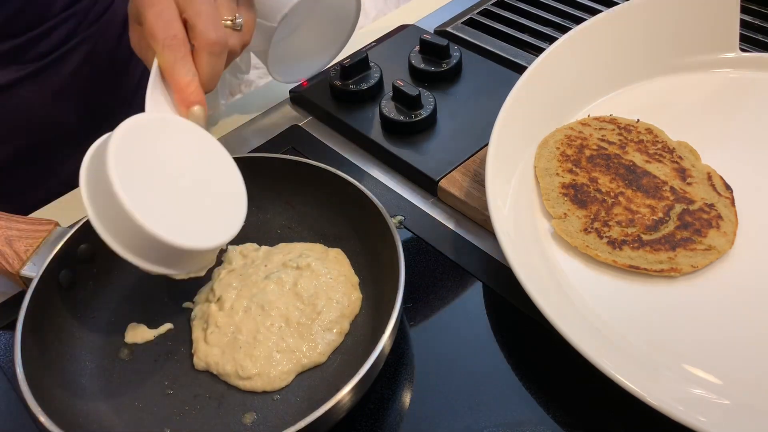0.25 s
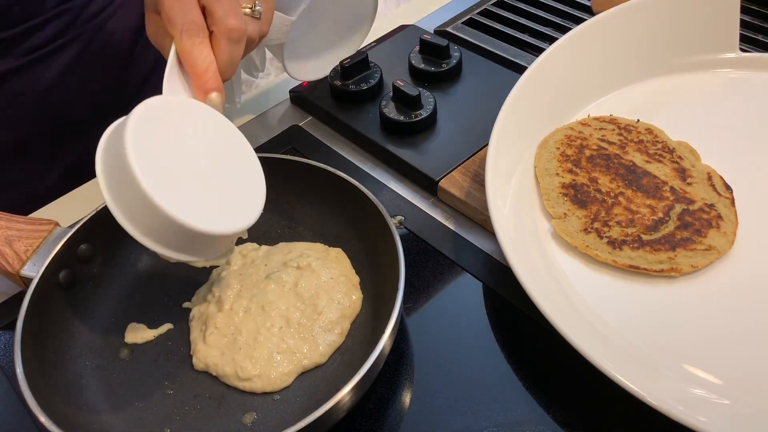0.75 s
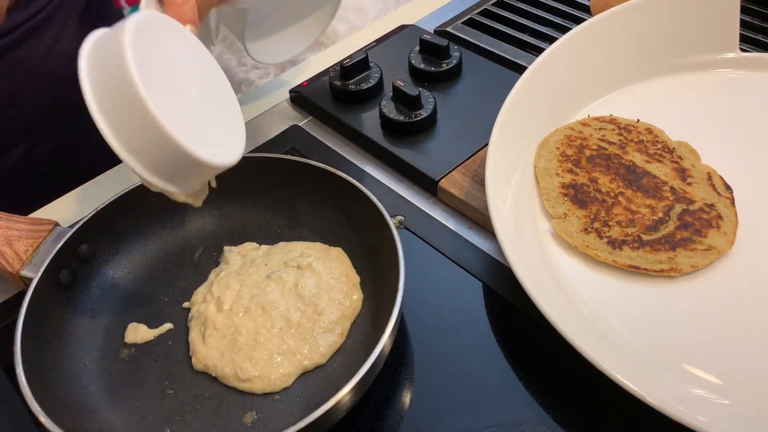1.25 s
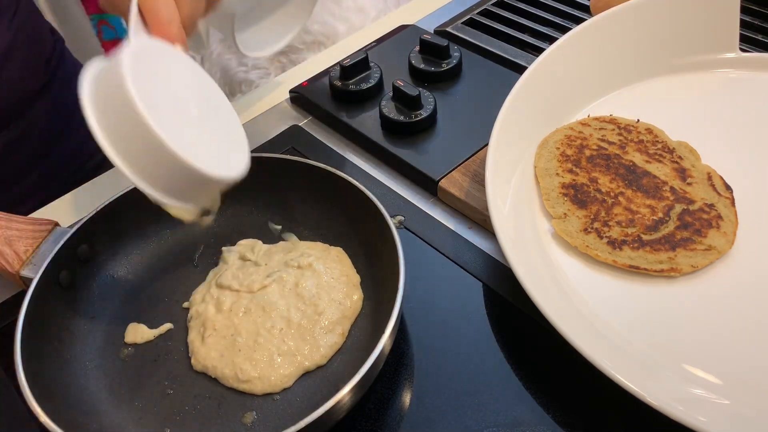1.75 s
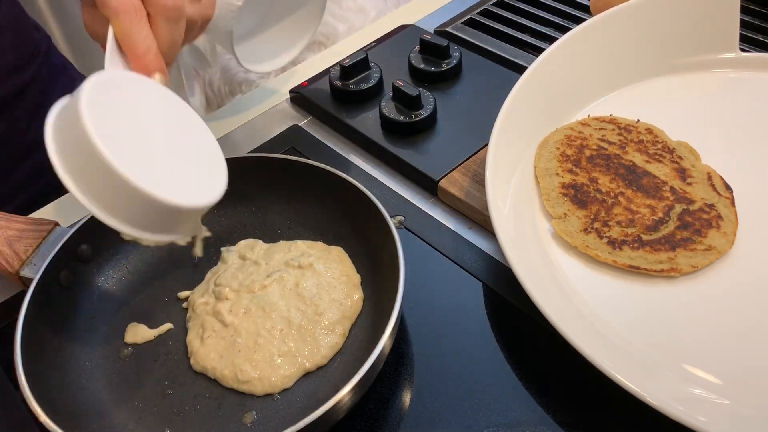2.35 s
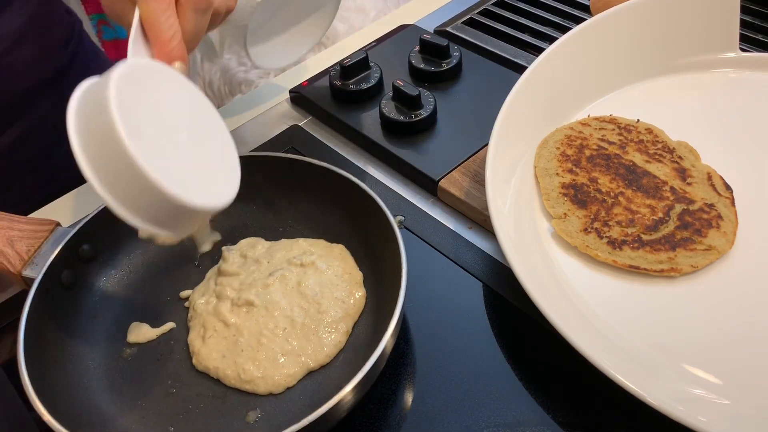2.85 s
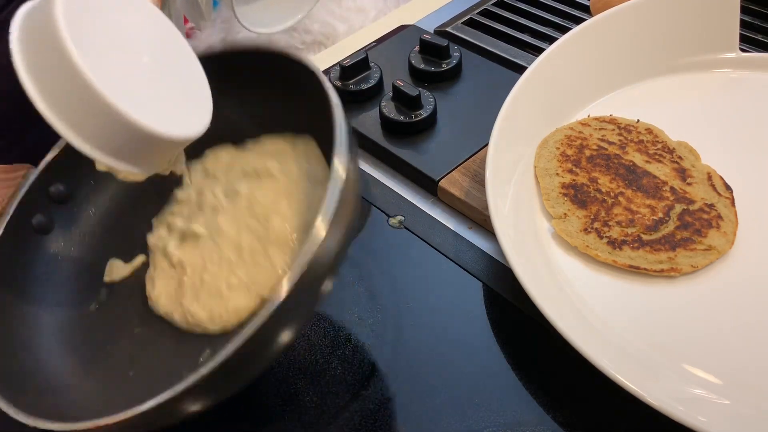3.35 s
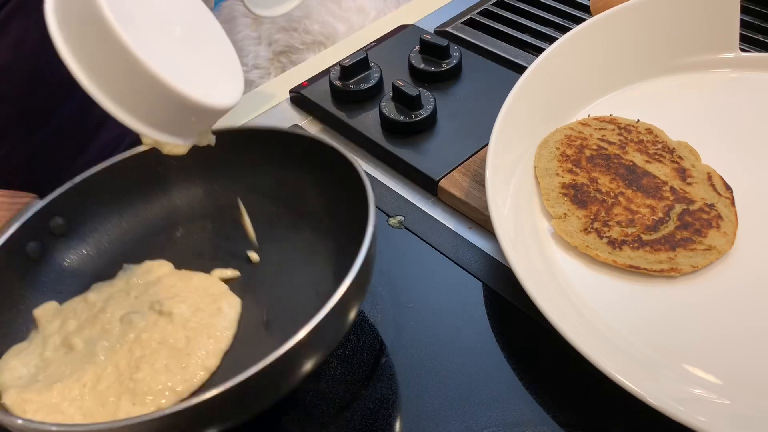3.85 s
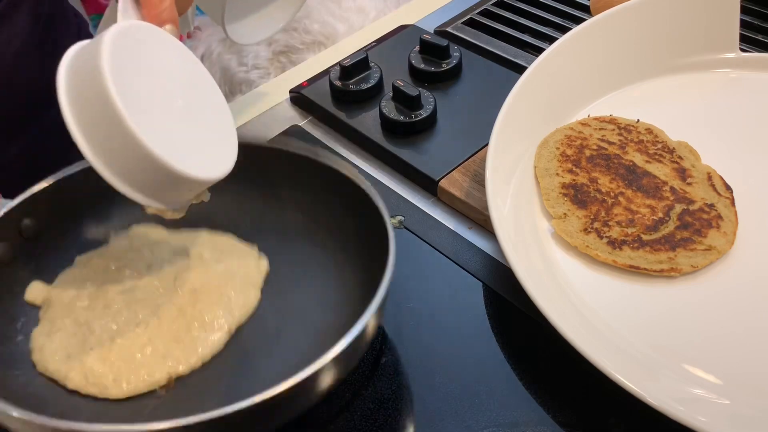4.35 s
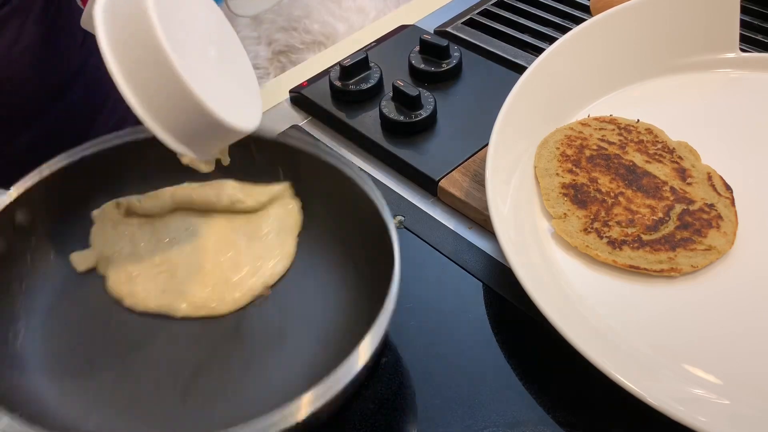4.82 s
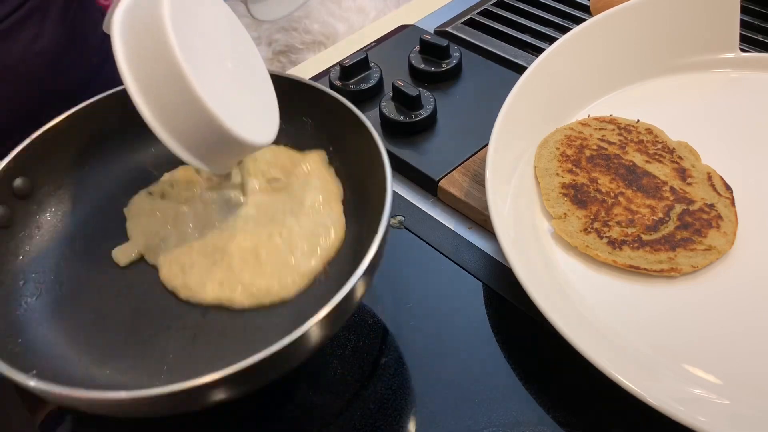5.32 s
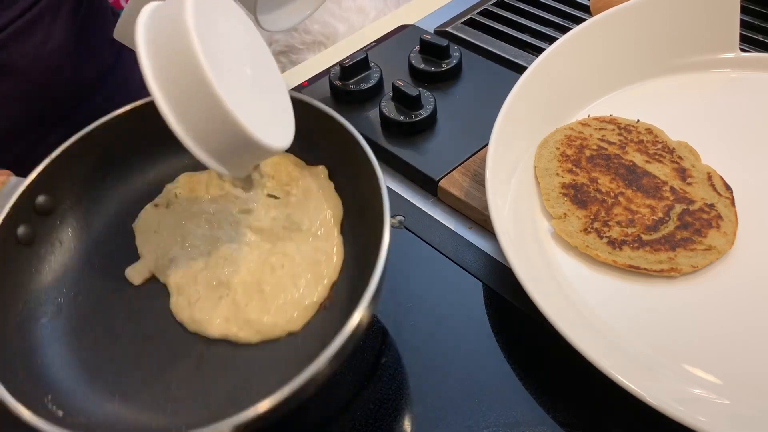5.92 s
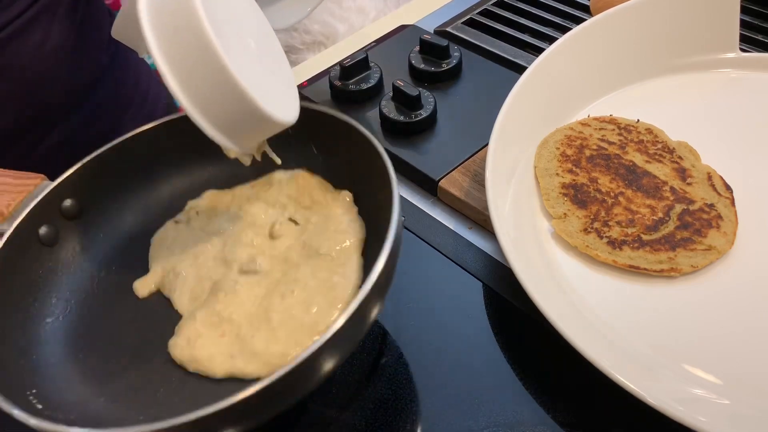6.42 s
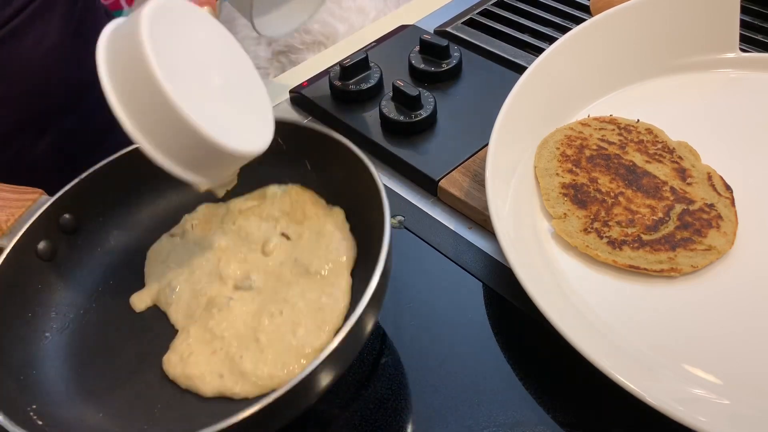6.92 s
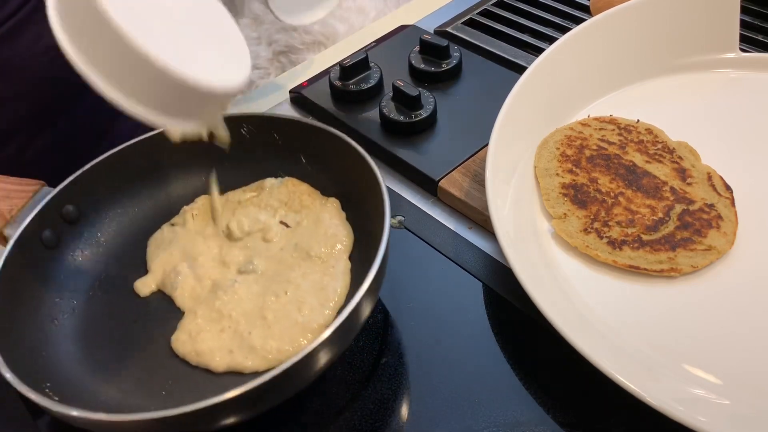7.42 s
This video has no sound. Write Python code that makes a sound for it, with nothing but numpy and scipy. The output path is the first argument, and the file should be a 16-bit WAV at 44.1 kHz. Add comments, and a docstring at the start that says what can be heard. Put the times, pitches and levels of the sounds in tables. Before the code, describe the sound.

Wet batter sizzles in a hot buttered pan as a steady bright fizz, then surges in quick pulses as the pan is swirled.

```python
"""Batter in a buttered pan

Batter sizzles close to a phone in a kitchen; from about 3 s the pan is lifted and swirled.
Steam bubbles burst as a dense fizz: noise of uneven grain that surges with each shake.
A cup ticks, dishes clink, a spoon chinks and the pan bumps: struck modes with crack, rattle and room.
Behind lie filtered-noise air, a low simmer, and motors and a whine made of wavering sines."""
import sys
import numpy as np
from scipy import signal
from scipy.fft import rfft, irfft, next_fast_len
from scipy.io import wavfile
from scipy.ndimage import uniform_filter1d, map_coordinates

SR = 44100
rng = np.random.default_rng(int(sys.argv[2]) if len(sys.argv) > 2 else 0)


def store_wav(level_fs):
    """Save 16-bit WAV to argv[1]."""
    pcm = np.round(np.clip(np.atleast_2d(level_fs), -1, 1) * 32767)
    wavfile.write(sys.argv[1], SR, pcm.T.astype(np.int16))


def invert_db(level):
    """Linear amplitude ratio for a level in decibels (20 dB per decade), elementwise."""
    return 10 ** (np.asarray(level, dtype=float) / 20)


N = 338322
T = np.arange(N) / SR
F = np.fft.rfftfreq(next_fast_len(N), 1 / SR) + 1e-3  # tiny offset keeps logs and divisions finite


def over_time(table):
    """Each column of a table as a straight-line curve."""
    s, *columns = np.transpose(table)
    return [np.interp(T, s, c) for c in columns]


def over_hz(table, hz):
    """Value of a table of f/Hz and value, read on a log axis."""
    return np.interp(np.log(hz), np.log(np.array(table)[:, 0]), np.array(table)[:, 1])


def shape(x, gain):
    """Filter by a gain given on the frequency grid."""
    return irfft(rfft(x, next_fast_len(N)) * gain, next_fast_len(N))[..., :N]


def unit(x):
    """Scale to rms 1."""
    return x / np.sqrt(np.mean(x ** 2))


def walk(rate):
    """Random levels held 1 / rate s and slewed twice; spread near 1."""
    k = int(SR / rate)
    held = np.repeat(rng.standard_normal(N // k + 1), k)
    return 1.3 * uniform_filter1d(uniform_filter1d(held, k), k)[:N]


def late(x, lag):
    """Delay by a fractional, possibly moving, number of samples."""
    return map_coordinates(x, [np.arange(N) - lag], order=3, mode="nearest")


# Colour of the fizz, relative: [f/Hz, level/dB per Hz]
FIZZ_COLOUR = [(700, -37), (880, -25), (960, -16.5), (1500, -14), (2300, -11), (3200, -10), (4500, -8),
               (7600, -4), (8300, 0.5), (11500, 0.5), (16000, 1.5)]
# Weight of the scattered share across the range: [f/Hz, weight]
SCATTER_WEIGHT = [(700, 0.26), (1600, 1.74), (2200, 0.78), (2700, 0.26), (3200, 0.81), (3800, 1.14),
                  (6500, 2.05), (8000, 0.46), (9300, 0.19), (10500, .2), (11300, 0.03), (12300, 0.13),
                  (16000, 0.17)]
# Where the pan is: [t/s, right port lag/samples]
PAN_PLACE = [(0, 7.7), (2.9, 7.34), (3.1, 9.5), (4.5, 9.8), (4.9, 8.7), (6.1, 8.3), (6.7, 9.7), (7.67, 8.4)]
# Steam from the hot batter between shakes: [t/s, level/dB]
STEAM_HEAT = [(0, -33.5), (1.99, -32.5), (2.94, -34), (3.14, -43), (3.66, -36), (4.16, -39.5), (4.7, -35),
              (5.06, -34.5), (5.4, -35.5), (5.9, -39.5), (6.25, -35), (6.52, -41.5), (7.01, -39),
              (7.67, -42)]
# Each shake slides batter onto hot metal: [t/s, surge level/dB]
PAN_SHAKES = [(3.011, 5.5), (3.196, 7), (3.337, 9), (3.557, 4.5), (3.693, 2.5), (3.981, 3), (4.19, 3),
              (4.353, 3.5), (4.509, 0), (4.81, 3.5), (4.937, 1.5), (5.067, 2.5), (5.183, 3), (5.303, 1),
              (5.524, 2.5), (5.7, 4), (5.887, 6.5), (6.076, 4), (6.291, 3.5), (6.487, 5.5), (6.667, 6),
              (6.827, 4), (7.01, 3.5), (7.334, 1)]
# How each range follows the steam:
# [f/Hz, share of slow changes, share of surges, gain on lifting/dB, fade after it/(dB/s)]
STEAM_FOLLOW = [(1600, 0.75, 0.55, 7.5, 0.73), (4830, 0.73, 0.64, 2, 1), (9000, 0.9, 0.88, 0.65, 0.35)]


def sizzle():
    """Steam bursts as noise of uneven grain; steam sets its level, and each half octave flickers a little alone."""
    surge_s, settle_s = 0.035, 1  # spread of a surge; time over which slow changes are averaged
    lift_s, lift_takes_s = 2.82, 0.22
    scattered_on_hob, scattered_lifted = 0.6, 0.34  # multiply the scatter weight
    steam_db = over_time(STEAM_HEAT)[0]
    steam_db = steam_db + sum(db * np.exp(-.5 * ((T - s) / surge_s) ** 2) for s, db in PAN_SHAKES)
    slow_db = uniform_filter1d(steam_db, int(settle_s * SR), mode="nearest")
    lifted = np.clip((T - lift_s) / lift_takes_s, 0, 1)
    swings = [slow * slow_db + quick * (steam_db - slow_db) + lifted * (lift_db - fade_db * (T - lift_s))
              for _, slow, quick, lift_db, fade_db in STEAM_FOLLOW]
    scattered = scattered_on_hob + (scattered_lifted - scattered_on_hob) * lifted

    grain = np.minimum(rng.exponential(size=(3, N)), 5)  # caps the loudest bursts
    bursts = unit(rng.standard_normal((3, N)) * invert_db(2.25 * grain + 0.68 * walk(150)))
    # row 0 is the straight path, rows 1 and 2 are scattered paths, thin near 11380 Hz
    bursts[1:] = shape(bursts[1:], 1 - np.exp(-((F - 11380) / 800) ** 2))
    colour = invert_db(over_hz(FIZZ_COLOUR, F))
    colour = colour / np.sqrt(np.mean(colour ** 2 * (F > 11900) * (F < 15300)))

    out = 0
    for hz in 400 * 2 ** np.arange(0, 6, .5):
        window = np.cos(np.pi * np.clip(np.log2(F / hz), -.5, .5)) ** 2
        band = shape(bursts, colour * window)
        # each band blends the swings of the two nearest ranges
        range_hz = np.log([r[0] for r in STEAM_FOLLOW])
        weights = [np.interp(np.log(hz), range_hz, row) for row in np.eye(3)]
        swing_db = sum(w * (c - c.mean()) for w, c in zip(weights, swings))
        band = band * invert_db(steam_db.mean() + swing_db + 1.05 * walk(20))
        share = np.clip(scattered * over_hz(SCATTER_WEIGHT, hz), 0, 1)
        out = out + np.sqrt(1 - share) * band[0] + np.sqrt(share) * band[1:]

    # the pan is nearer the left port, but the phone's treble comes first on the right
    treble = 1 / (1 + (7800 / F) ** 100)
    treble_left_lag, in_step_hz = 10.0, 9180  # samples; pitch at which the delay turns no phase
    turn = np.exp(-2j * np.pi * treble * (F - in_step_hz) / SR * treble_left_lag)
    left = shape(out[0], turn)
    right = late(shape(out[1], np.sqrt(1 - treble)), over_time(PAN_PLACE)[0])
    right = right + shape(out[1], np.sqrt(treble))
    return np.array([left, right])


def strike(events, modes, blur_hz, crack_db, rattle_db, rattle_s, tail_db, tail_s, right_lag):
    """Blows crack and ring the modes in a new mix each time, over a rattle of like colour and a room tail."""
    out, t = np.zeros(N), T[:SR // 3]
    hz, db, t60 = np.transpose(modes)[:, :, None]
    swell = 1 - np.exp(-t * hz / 1.5)  # each mode takes a cycle or two to build, so the lows come late
    fine_hz = np.fft.rfftfreq(len(t), 1 / SR) + 1
    edges = [(hz.min() / 2, -40)] + [m[:2] for m in modes] + [(hz.max() * 2, -30)]
    for (s, peak_db, *spot_hz), luck in zip(events, rng.standard_normal((len(events), len(modes), 1))):
        rattle = irfft(rfft(rng.standard_normal(len(t))) * invert_db(over_hz(edges, fine_hz)), len(t))
        slip = rng.standard_normal((len(modes), len(t)))
        # loose contact makes each mode's phase drift, which blurs its pitch
        wander = np.sqrt(2 * np.pi * blur_hz / SR) * np.cumsum(slip, axis=1)
        # and it breaks each ring into uneven swells
        chatter = invert_db(2.4 * unit(uniform_filter1d(slip, size=500)))
        # the spot that is hit favours modes near one pitch: 56 dB down an octave away
        spot_db = -56 * np.log2(hz / spot_hz[0]) ** 2 if spot_hz else 0
        level = invert_db(db + spot_db + 2.4 * luck) * swell * chatter * 1000. ** (-t / t60)
        ring = (level * np.sin(2 * np.pi * hz * t + wander)).sum(0)
        ring = ring / abs(ring).max() + invert_db(rattle_db) * unit(rattle) * 1000. ** (-t / rattle_s)
        ring = ring + invert_db(crack_db) * slip[0] * 1000. ** (-t / .014)  # a flat crack in front
        i = int(s * SR)
        out[i:i + len(t)] += (invert_db(peak_db) * ring)[:N - i]
    room = rng.standard_normal((2, len(t))) * 1000. ** (-t / tail_s) * (t > .004)
    apart = irfft(rfft(room[1]) * np.clip(fine_hz / 900, 0, 1), len(t))  # bass reaches both ports alike
    room = np.array([room[0] + apart, room[0] - apart])
    room = irfft(rfft(room) / np.hypot(1, fine_hz / 3000), len(t))  # walls swallow the treble
    room = room / np.sqrt((room ** 2).sum(1, keepdims=True))
    wet = invert_db(tail_db) * signal.fftconvolve(out[None], room, axes=1)[:, :N]
    return np.array([out, late(out, right_lag)]) + wet


# Dish clinks, peak of the ring alone: [t/s, level/dB]
DISH_CLINKS = [(.829, -19), (.836, -27), (.847, -29), (.870, -30), (.912, -38), (.934, -38)]
# Dish modes, relative: [f/Hz, level/dB, t60/s]
DISH_MODES = [(68, -6, 0.3), (160, -8, .25), (240, -4, 0.25), (330, -2, 0.09), (470, 7, 0.09),
              (550, 3, 0.06), (694, 2, 0.11), (882, -6, 0.6), (1130, -25, .05), (1500, 5, 0.1),
              (1870, -1, 0.17), (2343, -5, 0.3), (2510, 1, .12), (2760, 2, 0.08), (3430, 3, .07),
              (3914, 6, 0.07), (4380, 0, 0.06), (5040, 3, 0.07), (5950, 4, 0.04), (6950, 1, .035),
              (7850, 3, 0.03)]


def dish_clinks():
    """Dishes clink further off in the room: a hard crack and many short modes."""
    return strike(DISH_CLINKS, DISH_MODES, blur_hz=12, crack_db=-1, rattle_db=-13, rattle_s=.12,
                  tail_db=-6.5, tail_s=.35, right_lag=1.2)


# Spoon chinks, peak of the ring alone: [t/s, level/dB]
SPOON_CHINKS = [(.4225, -22), (.438, -30.5)]
# Spoon modes, relative: [f/Hz, level/dB, t60/s]
SPOON_MODES = [(184.4, -18, 0.34), (400, -8, 0.055), (520, -8, 0.055), (644, -14, 0.097),
               (713, -11.5, 0.22), (1380, -28, 0.065), (2680, -14, 0.069), (3210, -9, 0.091),
               (3450, -7, 0.098), (4420, -5.5, 0.11), (4900, -14, .05), (5300, -3, 0.18), (6140, -7, 0.093),
               (7760, 2, 0.15), (8300, 4, .1), (9670, -11, .08)]


def spoon_chinks():
    """A spoon chinks in the room: bright modes over a strong rattle."""
    return strike(SPOON_CHINKS, SPOON_MODES, blur_hz=25, crack_db=-6, rattle_db=-8, rattle_s=.1,
                  tail_db=-4, tail_s=.3, right_lag=.6)


# Cup ticks, peak of the ring alone: [t/s, level/dB]
CUP_TICKS = [(.281, -27), (.503, -31), (.567, -34), (.635, -36)]
# Cup modes, relative: [f/Hz, level/dB, t60/s]
CUP_MODES = [(470, -8, 0.05), (870, -8, 0.04), (1250, -7, .03), (1620, -5, 0.03), (1900, -7, .03),
             (2230, -1, 0.07), (2740, 2, 0.09)]


def cup_ticks():
    """A cup ticks by the pan: short modes of well blurred pitch."""
    return strike(CUP_TICKS, CUP_MODES, blur_hz=30, crack_db=-14, rattle_db=-8, rattle_s=.05,
                  tail_db=-9, tail_s=.15, right_lag=8.2)


# Pan bumps, peak of the ring alone: [t/s, level/dB, favoured f/Hz]
PAN_BUMPS = [(.003, -39.5, 510), (.645, -49, 500), (2.111, -46.5, 500), (2.82, -42.5, 670),
             (2.825, -50, 100), (2.848, -42.5, 250), (2.851, -44, 620), (2.872, -46, 125), (2.895, -41, 95),
             (2.93, -46, 120), (2.957, -42, 255), (2.966, -40, 606), (3.735, -49.5, 410), (7.033, -48, 480),
             (7.048, -50, 760), (7.312, -49, 490)]
# Pan modes, relative: [f/Hz, level/dB, t60/s]
PAN_MODES = [(80, -8, 0.18), (124, -9, 0.16), (252, -5, 0.23), (387, -5, 0.094), (504, 2.5, 0.064),
             (620, -2, 0.064), (735, -9, 0.078)]


def pan_bumps():
    """The pan bumps on the hob: low modes, picked out by the spot that is hit."""
    return strike(PAN_BUMPS, PAN_MODES, blur_hz=6, crack_db=-30, rattle_db=-14, rattle_s=.12,
                  tail_db=-7, tail_s=.25, right_lag=1.5)


# Level of the low simmer: [t/s, level/dB rms]
SIMMER_LEVEL = [(0, -59.5), (.45, -55.5), (.7, -60.5), (1.0, -59), (1.3, -61), (2.84, -60.5), (3.1, -65),
                (3.8, -59), (4.2, -70), (4.7, -59), (5.5, -64), (6.2, -58.5), (7.2, -68), (7.67, -139)]


def low_simmer():
    """A low simmer comes and goes: fluttering noise in a broad hump around 620 Hz."""
    flutter = invert_db(2.2 * walk(25))
    hump = np.exp(-np.log2(F / 620) ** 2)
    simmer = shape(rng.standard_normal((3, N)) * flutter, hump)
    return invert_db(over_time(SIMMER_LEVEL)[0]) * unit(simmer[0] + 0.46 * simmer[1:])


# Colour of the room air, relative: [f/Hz, level/dB per Hz]
AIR_COLOUR = [(12, -39), (25, -8), (60, 1.5), (150, -3.5), (300, -4), (430, -7.5), (600, -15), (820, -15.5),
              (1000, -16.5), (1500, -42), (2600, -62)]
# Level of the room air: [t/s, level/dB rms]
AIR_CURVE = [(0, -57), (1.0, -57), (1.3, -59.5), (5.0, -59.5), (7.67, -62)]


def room_air():
    """Room air is dark noise, close to mono in the bass and wider above."""
    mid, side = shape(rng.standard_normal((2, N)), invert_db(over_hz(AIR_COLOUR, F)))
    side = shape(side, np.clip(F / 1000, .13, 1))
    return invert_db(over_time(AIR_CURVE)[0]) * unit(mid + side * np.array([[1], [-1]]))


HUM_IN_STEP_S = .27  # moment at which the steady lines would agree


def line(level_db, cycles):
    """A sine of given rms level, its phase in cycles."""
    return np.sqrt(2) * invert_db(level_db) * np.cos(2 * np.pi * cycles)


# Motor lines, the rotor just under the mains so they beat: [f/Hz, level/dB rms, waver/dB]
HUM_LINES = [(57.58, -63.5, 1.5), (60.06, -67.5, 1.5)]


def motor_hum():
    """Rotor and mains lines beat, each wavering in level and slipping a little in time."""
    slip_s = .0005
    return sum(line(db + waver_db * walk(12), hz * (T - HUM_IN_STEP_S + slip_s * walk(11)))
               for hz, db, waver_db in HUM_LINES)


# Level of the whine before its waver: [t/s, level/dB rms]
WHINE_LEVEL = [(0, -69), (6.2, -69.5), (6.7, -75), (7.67, -78)]


def whine():
    """A whine at the sixth multiple of the mains, unsteady in pitch and level."""
    drift = np.cumsum(1.47 * walk(8)) / SR  # cycles gained by a pitch that wavers a hertz or two
    return line(over_time(WHINE_LEVEL)[0] + 2.6 * walk(12), 360.3 * T + drift)


# Lines of the second motor, locked to the mains: [f/Hz, level/dB rms]
MOTOR_LINES = [(60.06, -62.5), (120.12, -60.5)]


def second_motor():
    """A second motor starts late: mains-locked lines that waver in level."""
    start_s, rise_s = 7.04, 0.026
    motor = sum(line(db + 1.4 * walk(18), hz * (T - HUM_IN_STEP_S)) for hz, db in MOTOR_LINES)
    return motor * np.clip((T - start_s) / rise_s, 0, 1)


def scene():
    """All sources together."""
    knocks = dish_clinks() + spoon_chinks() + cup_ticks() + pan_bumps()
    kitchen = low_simmer() + room_air() + motor_hum() + whine() + second_motor()
    return sizzle() + knocks + kitchen


def roll_off(x):
    """The treble ends steeply here."""
    return signal.sosfilt(signal.butter(12, 15400, fs=SR, output="sos"), x)


# Left-right balance across pitch: [f/Hz, left minus right level/dB]
PORT_BALANCE = [(150, 0.4), (400, -1.5), (700, 1.5), (1400, 6), (1850, 6), (2200, 2), (4000, 3),
                (6500, -3.5), (8200, 0), (9000, -1.5), (10000, -0.5)]


def record(dry):
    """The two ports differ in level across pitch, most around 1.5 kHz."""
    lift_db = over_hz(PORT_BALANCE, F) * np.array([[.5], [-.5]])
    mix = shape(dry, invert_db(lift_db))
    return roll_off(mix)


dry = scene()
out = record(dry)
store_wav(out)
```